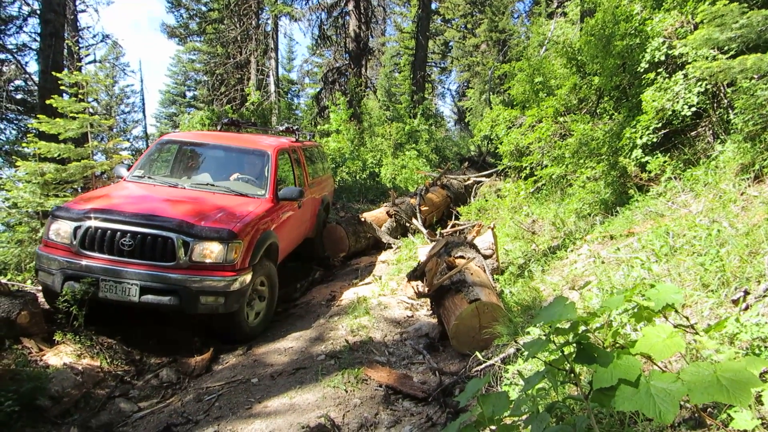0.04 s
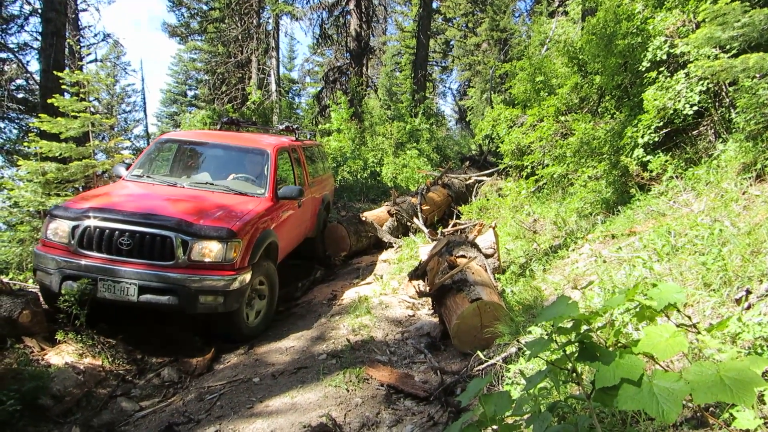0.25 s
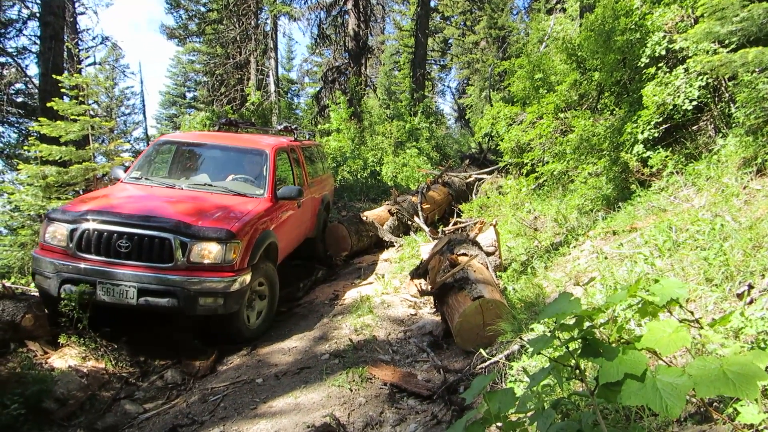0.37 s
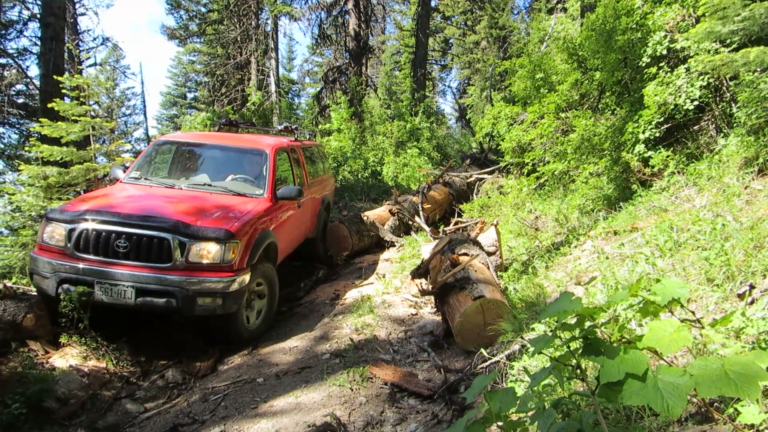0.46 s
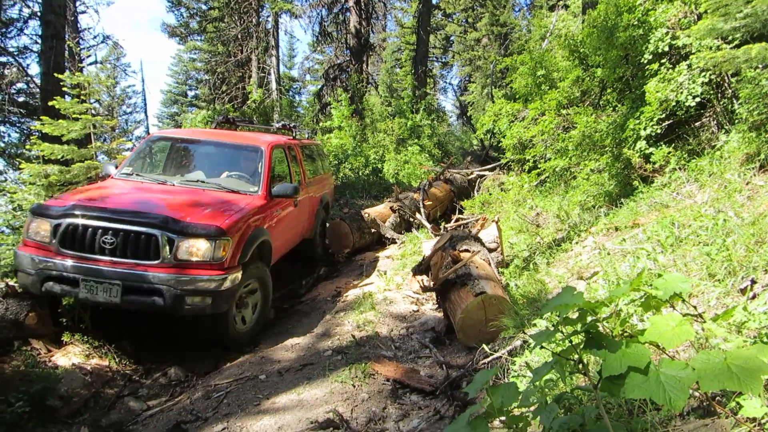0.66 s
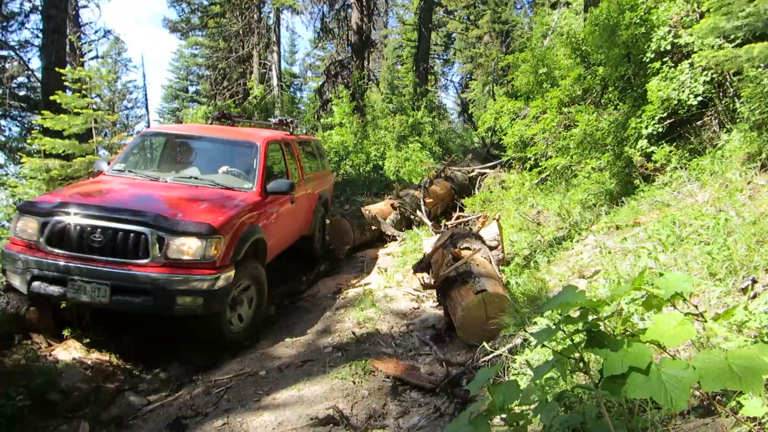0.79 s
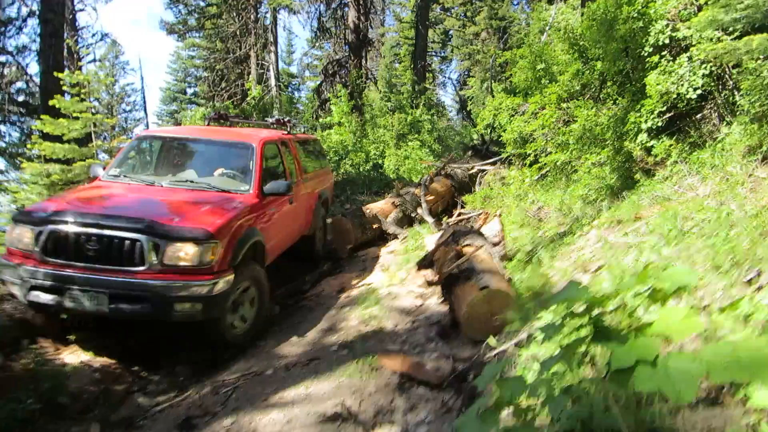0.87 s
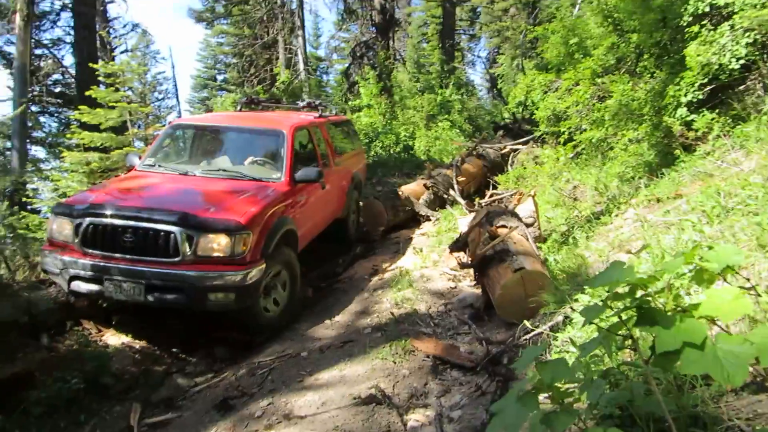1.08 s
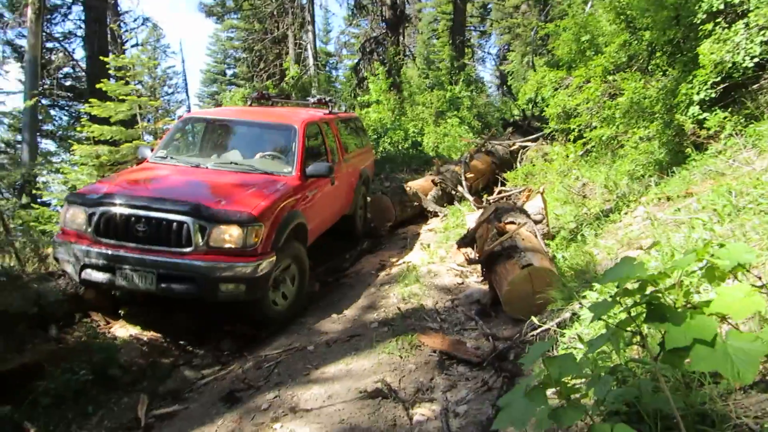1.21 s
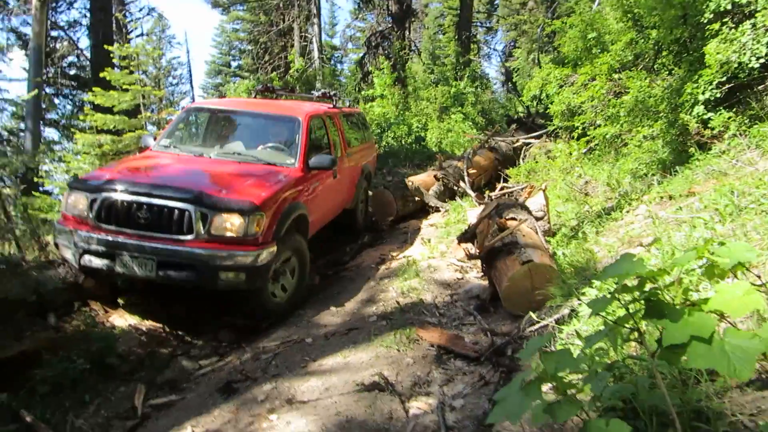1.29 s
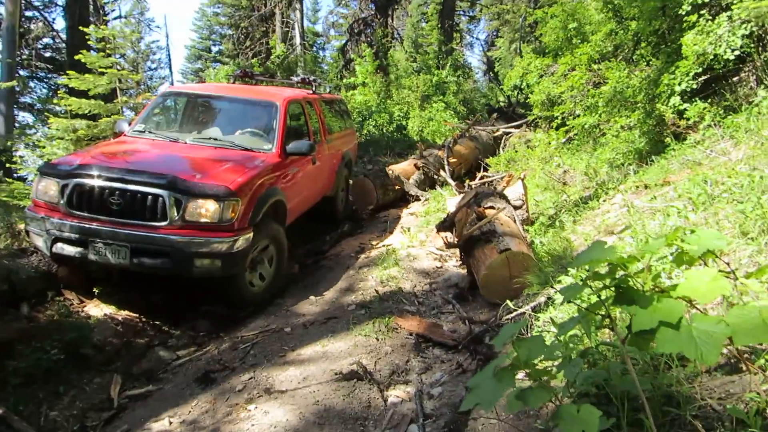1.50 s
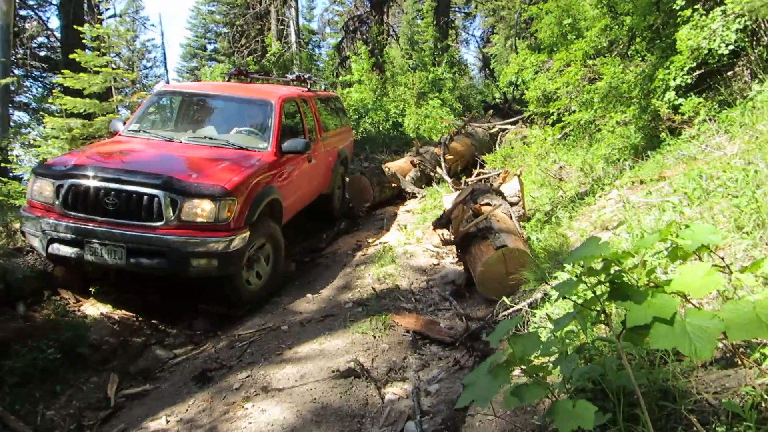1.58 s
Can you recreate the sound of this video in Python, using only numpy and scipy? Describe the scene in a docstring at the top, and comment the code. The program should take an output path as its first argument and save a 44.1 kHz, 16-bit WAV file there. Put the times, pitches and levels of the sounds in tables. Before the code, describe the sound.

A pickup truck crawls over a forest dirt track a few metres away. Its idling engine revs up with a whirring fan, the tyres crunch grit and snap dry sticks, then the engine eases to a low drone.

```python
"""A pickup truck crawls along a forest dirt track, a few metres away. At first its six-cylinder engine
idles, puffing through the exhaust. From 0.2 s it revs up and the fan whirrs louder, while the tyres
grind over grit and snap dry twigs. Sticks crack loudly near 0.4 s and 0.7 s, and the trees scatter
the cracks. At 0.8 s the throttle shuts; the engine soon slows and the last twigs break.
Near the end it pulls again with a low drone."""
import sys
import numpy as np
from scipy import signal
from scipy.fft import rfft, irfft
from scipy.io import wavfile
from scipy.ndimage import uniform_filter1d

SR = 44100
rng = np.random.default_rng(int(sys.argv[2]) if len(sys.argv) > 2 else 0)


def inscribe(sig):
    """Save sig as 16-bit PCM at rate SR to the path in sys.argv[1].

    A 1-D sig is mono; a 2-D sig holds one channel per row.
    Samples are clipped to [-1, 1] before scaling.
    """
    pcm = np.round(np.clip(np.atleast_2d(sig).T, -1, 1) * 32767)
    wavfile.write(sys.argv[1], SR, pcm.astype(np.int16))


N = 72765


# How often one bank (three of the six cylinders) fires: t/s, f/Hz
BANK_RATE = [(0, 20.84), (.196, 20.77), (.288, 25.84), (.362, 33.49), (.412, 38.27), (.504, 49.55),
             (.602, 53.81), (.68, 55.9), (.75, 55.5), (.84, 63.9), (.978, 65.35), (1.172, 60),
             (1.33, 54.65), (1.5, 50.2), (1.65, 48.86)]
# How hard the engine works: t/s, level/dB
ENGINE_LOAD = [(0, -7.5), (.19, -8), (.235, 2), (.34, -6), (.41, 4), (.46, -1.5), (.53, -2), (.61, 3.5),
               (.73, -3), (.765, 0), (.79, -23), (1.0, -13.5), (1.19, -12.5), (1.235, -11), (1.32, -25),
               (1.44, -11.5), (1.65, -8.5)]
# The firing note, at twice the bank rate: t/s, level/dB
FIRING_LEVEL = [(0, -63), (.17, -61), (.27, -45), (.4, -43.5), (.5, -43), (.66, -41.5), (.8, -54),
                (1.0, -52), (1.13, -46), (1.25, -54.5), (1.36, -48.5), (1.65, -48)]
# The drone, at three times the bank rate: t/s, level/dB
DRONE_LEVEL = [(0, -72), (.2, -55), (.34, -43), (.5, -50), (.57, -40.5), (.64, -31.5), (.73, -38.5),
               (.765, -41), (.79, -51.5), (1.19, -60.5), (1.23, -44), (1.32, -50), (1.45, -38.5),
               (1.55, -44), (1.65, -38)]
# Higher tones: multiple of the bank rate, base level/dB, how strongly it follows the load
OVERTONES = [(4, -39, 1.51), (5, -50, 2.4), (6, -41, 0.72), (7, -45, .8), (8, -42, 1), (9, -53.5, 1.8)]
# How the pipe boosts or weakens those tones: f/Hz, level/dB
PIPE_RESPONSE = [(25, -24), (60, -11), (110, -4.5), (155, -1.5), (215, 1), (270, -10.5), (370, -7.5),
                 (600, -10)]
# Loudness of the swirling exhaust gas: t/s, level/dB
RUMBLE_LEVEL = [(0, -54), (.06, -36.5), (.16, -51.5), (.225, -36), (.33, -39.5), (.41, -31.5), (.47, -47),
                (.62, -46), (.75, -32), (.8, -58), (.92, -48.5), (1.05, -46.5), (1.19, -63), (1.23, -59),
                (1.33, -51.5), (1.45, -51), (1.65, -46)]
# Tone of the swirling gas: f/Hz, level/dB
RUMBLE_SPECTRUM = [(20, -21), (50, -26), (90, -8), (150, 3), (215, 1.5), (290, -25), (430, -15.5),
                   (900, -9), (3000, -50)]

def exhaust(firings):
    """Puffs of gas make a note, a drone and overtones that swell with load; swirling gas rumbles."""
    load, rate = curve(ENGINE_LOAD), curve(BANK_RATE)
    note = amp(curve(FIRING_LEVEL)) * engine_tone(2 * firings)
    drone = amp(curve(DRONE_LEVEL)) * engine_tone(3 * firings)
    overtones = sum(amp(db + follow * load + read(PIPE_RESPONSE, k * rate)) * engine_tone(k * firings)
                    for k, db, follow in OVERTONES)
    rumble = amp(curve(RUMBLE_LEVEL)) * colour(rng.standard_normal((2, N)), RUMBLE_SPECTRUM)
    return note + drone + overtones + rumble


def engine_tone(cycles, waver=0.22):
    """One pure tone of the engine, a little unsteady in strength."""
    strength = 1 + waver * drift(hz=24.4)
    return strength * np.sqrt(2) * np.cos(2 * np.pi * (cycles + rng.random()))


# Twigs snapping: t/s, level/dB, decay/s, centre f/Hz
TWIG_SNAPS = [(.043, -33, 0.0055, 4650), (0.2032, -31, 0.0023, 4070), (0.2221, -30.5, 0.0036, 3050),
              (0.2244, -20, 0.0016, 2700), (0.2557, -27, 0.0015, 5100), (.275, -27.5, .002, 1970),
              (0.288, -30, 0.0042, 5260), (0.3626, -24, 0.0062, 2080), (0.3768, -31, 0.0025, 3000),
              (.408, -19, 0.00083, 8900), (.4322, -29, .002, 5000), (.4695, -29.5, 0.0043, 3560),
              (0.4997, -22, 0.0011, 3440), (0.544, -30, 0.0021, 4940), (0.6159, -22.5, 0.0039, 3800),
              (.644, -30.5, 0.0017, 4450), (0.6573, -13, 0.00051, 3830), (0.7082, -18.5, 0.0016, 2460),
              (0.732, -27, 0.0021, 2950), (0.7562, -16, 0.00067, 6500), (0.7714, -19, 0.0047, 5160),
              (0.773, -31, 0.0054, 5100), (.795, -47, 0.0014, 3200), (0.84, -26.5, 0.0047, 3330),
              (.869, -25, 0.0038, 4040), (0.8824, -25, 0.0014, 5500), (.9005, -25, 0.002, 5040),
              (0.902, -16.5, 0.0015, 2580), (0.9077, -23.5, 0.0032, 2300), (0.9347, -25.5, 0.0064, 3700),
              (0.98, -40, 0.00081, 3000), (1.002, -29.5, 0.0022, 7140), (1.0193, -26.5, 0.0013, 3096),
              (1.109, -35, 0.00064, 7997)]
# Sticks breaking: t/s, level/dB, decay/s, centre f/Hz, treble cut-off f/Hz, four ringing notes f/Hz
STICK_CRACKS = [(0.4243, -7.5, 0.0015, 7440, 8700, 1830, 3480, 7250, 7870),
                (0.6724, -12, 0.0016, 6100, 13000, 3400, 3900, 5410, 6960),
                (0.7293, -10, 0.0022, 3160, 5950, 2040, 3630, 4520, 4540),
                (.7637, -8.5, 0.0011, 6240, 9050, 3260, 5000, 6040, 7970),
                (0.7644, -10.5, 0.0032, 1508, 8100, 1390, 1820, 2220, 2876),
                (0.7675, -12.5, 0.00053, 2630, 8000, 1455, 1910, 2450, 3700)]
# Balance of those four notes: level/dB
STICK_RING_DB = [-5.5, -2, -1, -1]
# Hollow knocks of thicker wood: t/s, level/dB, decay/s, f/Hz
KNOCKS = [(.3075, -24, 0.0046, 633), (0.4241, -19, 0.0035, 800), (0.425, -23.5, 0.0034, 1080),
          (.937, -25, 0.0057, 736), (.939, -25.5, 0.0064, 1308), (1.0212, -22.5, 0.0033, 1393)]
# The notes in each knock: multiple of its pitch, level/dB
KNOCK_NOTES = [(1, 0), (1.83, -17), (3.15, -24)]

def breaking_wood():
    """Under the tyres twigs snap, sticks crack and ring briefly, and thicker pieces knock."""
    out = np.zeros(N)
    for start, db, decay, hz in TWIG_SNAPS:
        add(out, start, amp(db) * splinter(decay, hz, top_hz=11300, branch_share=0.85))
    for start, db, decay, hz, top_hz, *pitches in STICK_CRACKS:
        rings = sum(amp(ring_db) * ring(f, 1.06 * decay) for f, ring_db in zip(pitches, STICK_RING_DB))
        crack = splinter(decay, hz, top_hz, branch_share=0.38)
        add(out, start, amp(db) * (0.96 * crack + rings / 2))
    for start, db, decay, hz in KNOCKS:
        knock = sum(amp(note_db) * ring(hz * k, decay / k) for k, note_db in KNOCK_NOTES)
        add(out, start, amp(db) * knock / np.sqrt(2))
    return out


# Pitches at which the dry branches ring: f/Hz, width/Hz, level/dB
BRANCH_RESONANCES = [(1517, 69, 4), (2166, 270, 5), (3420, 160, -5), (4900, 570, -6)]

def splinter(decay, centre_hz, top_hz, branch_share, bass_hz=328):
    """Fibres break in a fast, dying run; the twig's size and the branches under it set the tone."""
    t = np.arange(2048) / SR
    f = np.fft.rfftfreq(len(t), 1 / SR)
    fibres = rng.standard_normal((2, len(t)))[0]  # one channel of noise
    burst = np.tanh(fibres / 2) * wood_fade(t, decay)
    twig = resonance(f, centre_hz, width=1.56 * centre_hz) + amp(-6) / (1 + 1j * f / centre_hz)
    branches = sum(amp(db) * resonance(f, hz, width) for hz, width, db in BRANCH_RESONANCES)
    bass_cut = f / (f - 1j * bass_hz)  # branches give off little bass
    treble_cut = 1 / (1 + 1j * f / top_hz) ** 2
    snap = irfft(rfft(burst) * twig * (1 + branch_share * branches) * bass_cut * treble_cut)
    return snap * np.sqrt(decay * SR / np.sum(snap ** 2))  # longer snaps carry more energy


def ring(hz, decay):
    """Wood vibrates at one pitch and dies away."""
    t = np.arange(2048) / SR
    return 2 * np.sin(2 * np.pi * (hz * t + rng.random())) * wood_fade(t, decay)


def wood_fade(t, decay, attack_s=0.00031):
    """The loudness of a break jumps up, then fades."""
    return np.minimum(t / attack_s, 1) * np.exp(-t / decay)


# Loudness of the grit under the tyres: t/s, level/dB
GRIT_LEVEL = [(0, -67), (.19, -44), (.24, -50), (.33, -46), (.39, -36), (.46, -48), (.57, -49),
              (.66, -39.5), (.77, -29), (.82, -42.5), (.93, -34), (.99, -41), (1.08, -45.5), (1.3, -63),
              (1.65, -50)]
# Tone of the grit: f/Hz, level/dB
GRIT_SPECTRUM = [(150, 3), (500, 1.5), (1200, 8), (2200, 13), (4500, 9), (8000, 5), (12000, -1),
                 (16000, -2)]

def grit(grains_per_s=1800, spread_db=3.5, decay_s=0.00075):
    """Tiny grains break under the rolling tyres in a dense patter."""
    sizes = amp(spread_db * np.minimum(rng.exponential(1, (2, N)), 4))
    breaks = rng.random((2, N)) < grains_per_s / SR
    fades = signal.lfilter([1], [1, -np.exp(-1 / (decay_s * SR))], sizes * breaks)
    grains = fades * rng.standard_normal((2, N))
    return colour(grains, GRIT_SPECTRUM) * amp(curve(GRIT_LEVEL))


# Loudness of the fan, belts and valves: t/s, level/dB
WHIRR_LEVEL = [(0, -40), (.18, -41.5), (.32, -34), (.5, -37.5), (.7, -29.5), (.82, -40.5), (1.1, -43.5),
               (1.25, -40.5), (1.42, -38.5), (1.55, -37), (1.65, -38)]
# Tone of their whirr: f/Hz, level/dB
WHIRR_SPECTRUM = [(150, -5), (250, -4.5), (393, -11), (500, -13.5), (600, -6), (830, -6.5), (1060, -8),
                  (1260, -6), (1500, -8), (3000, -12.5), (6000, -14), (9000, -20), (12000, -28.5),
                  (15800, -32)]
# Pitches at which the engine bay rings: f/Hz, width/Hz, level/dB
BAY_RESONANCES = [(666, 74, 7.5), (915, 200, 5.5), (1247, 116, 5), (3770, 53, 4.9), (5030, 150, 4.3),
                  (5800, 67, 1)]

def whirr(firings, flicker_db=1.5, throb_depth=0.083):
    """Fan and valve noise rings in the engine bay and throbs each time a cylinder fires."""
    bands = signal.stft(rng.standard_normal((2, N)), nperseg=512)[2]
    flicker = uniform_filter1d(rng.standard_normal(bands.shape[1:]), size=7, axis=0)  # smooth in pitch
    flicker = unit(uniform_filter1d(flicker, size=8, axis=1))  # and in time
    noise = signal.istft(bands * amp(flicker_db * flicker), nperseg=512)[1][:, :N]
    throb = 1 + throb_depth * np.cos(2 * np.pi * 2 * firings)
    return colour(noise * throb, WHIRR_SPECTRUM, BAY_RESONANCES) * amp(curve(WHIRR_LEVEL))


# The truck settling on its springs: t/s, level/dB, decay/s, f/Hz
THUMPS = [(0.213, -39, 0.053, 209), (0.382, -37, 0.016, 76), (0.903, -44, 0.018, 286),
          (1.215, -42.5, 0.035, 149.5)]

def body_thumps(attack_s=0.0028):
    """The truck's body booms softly as it rocks over the ruts."""
    out, t = np.zeros(N), np.arange(SR // 4) / SR
    for start, db, decay, hz in THUMPS:
        fade = (1 - np.exp(-t / attack_s)) * np.exp(-t / decay)
        add(out, start, 2 * amp(db) * np.sin(2 * np.pi * hz * t) * fade)
    return out


# How long the echo from the trees takes to fade by 60 dB: f/Hz, t/s
TREE_ECHO_TIME = [(200, 0.26), (1500, 1), (5000, 0.54), (9000, 0.25), (15000, 0.081)]

def forest(sound, echoes_per_s=4000, ground_decay_s=0.0066):
    """Sound bounces quickly off the ground and the truck, then scatters thinly from the trunks."""
    t = np.arange(SR // 2) / SR
    bounces = rng.standard_normal((2, len(t))) * (t > .003)
    bounces *= rng.random((2, len(t))) < echoes_per_s / SR
    hz, when, bands = signal.stft(bounces, SR, nperseg=256)
    fade = amp(-60 * when / read(TREE_ECHO_TIME, hz)[:, None])
    trunks = signal.istft(bands * fade, SR, nperseg=256)[1][:, :len(t)]
    ground = rng.standard_normal((2, len(t))) * np.exp(-t / ground_decay_s) * (t > .002)
    echo = amp(-22) * unit(trunks) + amp(-13.5) * unit(ground)
    echo = (echo + 0.49 * echo[::-1]) / np.sqrt(len(t))  # left and right partly blend
    return sound + signal.fftconvolve(sound[None], echo, axes=1)[:, :N]


# Pump and alternator tones: multiple of the bank rate, level/dB
WHINES = [(16.8, -58.5), (29.6, -60), (53.8, -58), (64.8, -58.5)]

def belt_whine():
    """The belt spins the pump and alternator, so their faint whine follows the engine's speed."""
    cycles = count_firings(wobble=0.00267, wobble_hz=8.85)
    return sum(amp(db) * engine_tone(k * cycles) for k, db in WHINES)


# Tone of light air on the microphones: f/Hz, level/dB
BREEZE_SPECTRUM = [(5, -5), (25, -17), (50, -2), (120, -12), (500, -70)]

def breeze(level_db=-67.5):
    """Moving air faintly buffets each microphone on its own."""
    f = np.fft.rfftfreq(N, 1 / SR)
    noise = rfft(rng.standard_normal((2, N)))
    return amp(level_db) * unit(irfft(noise * amp(read(BREEZE_SPECTRUM, f)), N))


# How alike left and right are: f/Hz, likeness (1 = the same)
LIKENESS = [(60, 0.27), (150, 1), (380, 0.91), (950, 0.91), (2380, 0.82), (5980, 0.92), (15000, 0.32)]

def colour(pair, spectrum, peaks=()):
    """Shapes the tone of two unrelated noises and blends them into left and right."""
    f = np.fft.rfftfreq(N, 1 / SR)
    left, other = rfft(pair)
    same = np.clip(read(LIKENESS, f), 0, 1)
    right = same * left + np.sqrt(1 - same ** 2) * other
    peaks_db = sum(db / (1 + (2 * (f - hz) / width) ** 2) for hz, width, db in peaks)
    return unit(irfft(np.array([left, right]) * amp(read(spectrum, f) + peaks_db), N))


def count_firings(wobble, wobble_hz):
    """A running count of one bank's firings, at a slightly uneven pace."""
    return np.cumsum(curve(BANK_RATE) * (1 + wobble * drift(wobble_hz))) / SR


def amp(db):
    """Turns decibels into a gain."""
    return 10 ** (np.asarray(db) / 20)


def unit(x):
    """Scales a signal to an average strength (rms) of 1."""
    return x / np.sqrt(np.mean(x ** 2) + 1e-20)


def curve(points):
    """Joins points in time with straight lines."""
    return np.interp(np.arange(N) / SR, *np.transpose(points))


def read(points, hz):
    """Looks up a frequency in a table, on a log scale."""
    f, value = np.transpose(points)
    return np.interp(np.log(hz + 1), np.log(f + 1), value)


def add(mix, start, sound):
    """Mixes a sound in, start seconds from the beginning."""
    part = mix[round(start * SR):][:len(sound)]
    part += sound[:len(part)]


def drift(hz):
    """A random wander, mostly slower than hz."""
    f = np.fft.rfftfreq(N, 1 / SR)
    return unit(irfft(rfft(rng.standard_normal(N)) * np.exp(-(f / hz) ** 2), N))


def resonance(f, hz, width):
    """A filter that favours pitches near hz."""
    return 1 / (1 + 1j * (f - hz ** 2 / (f + 1)) / width)


def pan(db):
    """Gains that make the left side db louder than the right."""
    return amp(np.array([[db], [-db]]) / 2)


def scene():
    """Engine, tyres, body and breeze together; only the breaking wood echoes."""
    firings = count_firings(wobble=0.0063, wobble_hz=30)
    engine = exhaust(firings) + (whirr(firings) + belt_whine()) * pan(db=1)
    background = breeze() + body_thumps()
    tyres = (grit() + forest(breaking_wood())) * pan(db=1.3)
    return engine + tyres + background


# How much louder the left microphone is than the right: f/Hz, level/dB
LEFT_LEVEL = [(60, -2.5), (150, -4), (380, -3.5), (950, -2), (2380, -0.5), (5980, -1), (15000, -1)]
# How far the left one's wave runs ahead: f/Hz, phase/rad
LEFT_LEAD = [(0, 0), (1550, 0.39), (5510, 0.56), (11300, 0.86), (12100, 1.0), (14900, 1.0), (15600, 1.0)]
# How both soften the treble: f/Hz, level/dB
MIC_TREBLE = [(9000, 0), (12000, -1.5), (15000, -5), (16000, -8)]

def record(dry, top_hz=16000):
    """Two microphones hear slightly different sounds; the loudest cracks clip; the top treble is cut."""
    f = np.fft.rfftfreq(2 * N, 1 / SR)
    left = amp(read(LEFT_LEVEL, f) / 2) * np.exp(.5j * read(LEFT_LEAD, f))
    response = amp(read(MIC_TREBLE, f)) * np.array([left, 1 / left])
    heard = irfft(rfft(dry, 2 * N) * response)[:, :N]
    low_pass = signal.firwin(511, top_hz, window=("kaiser", 9), fs=SR)
    return signal.oaconvolve(np.clip(heard, -1, 1), low_pass[None], "same")


dry = scene()
out = record(dry)
inscribe(out)
```